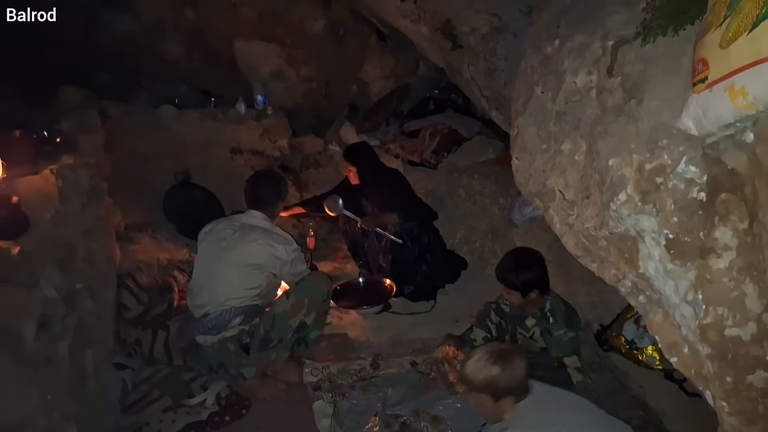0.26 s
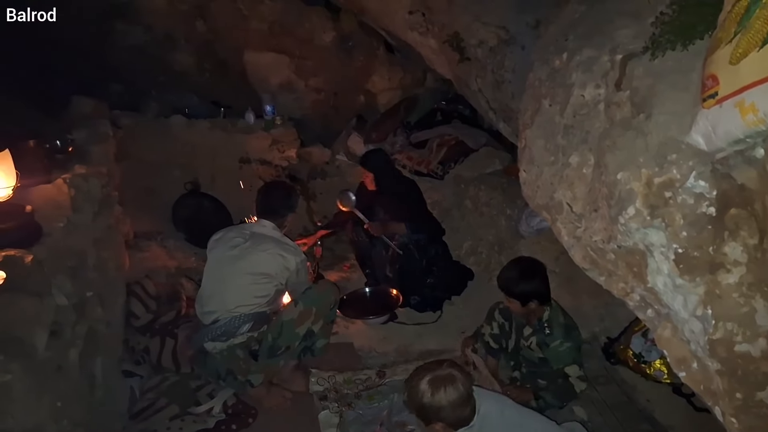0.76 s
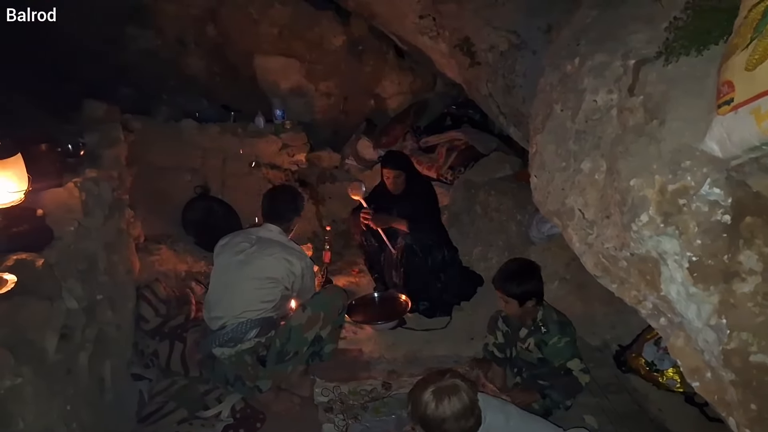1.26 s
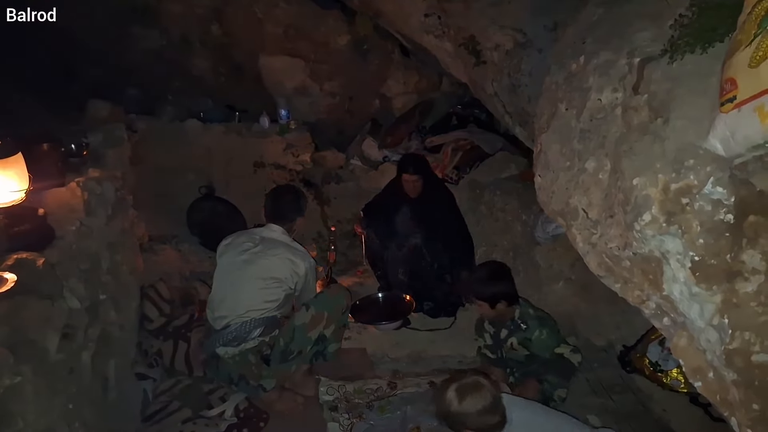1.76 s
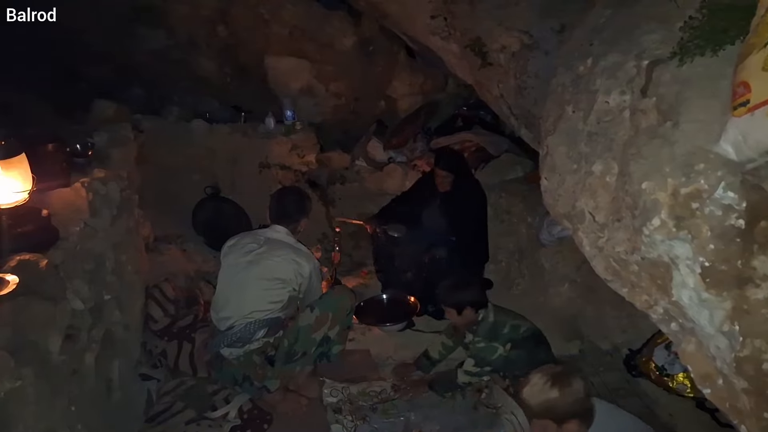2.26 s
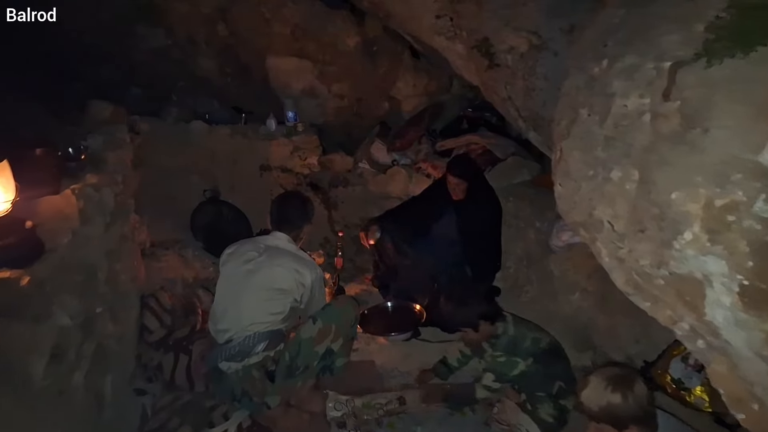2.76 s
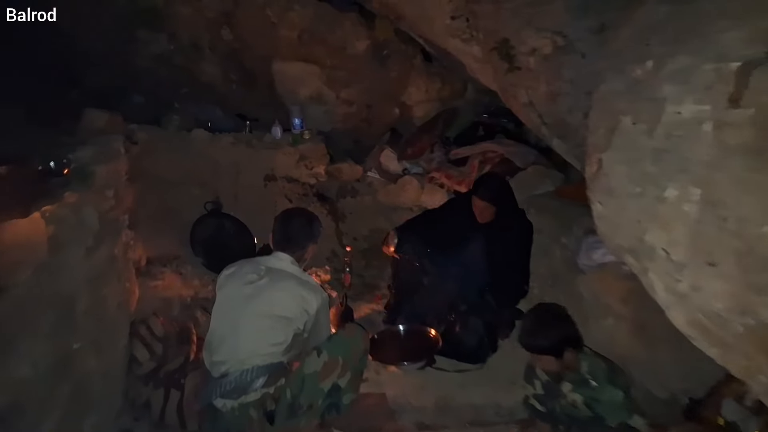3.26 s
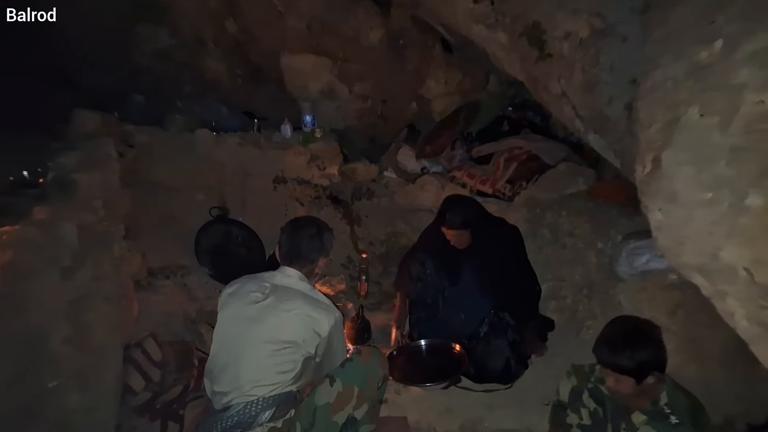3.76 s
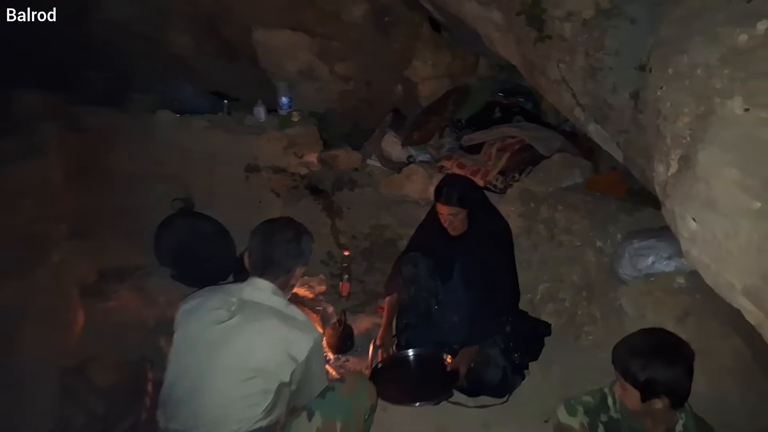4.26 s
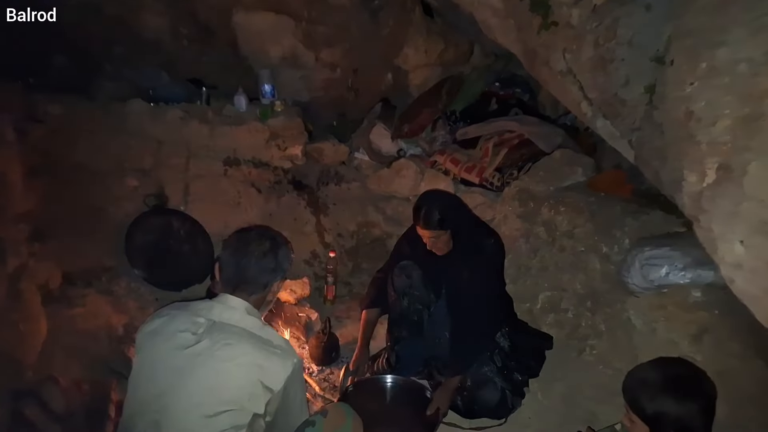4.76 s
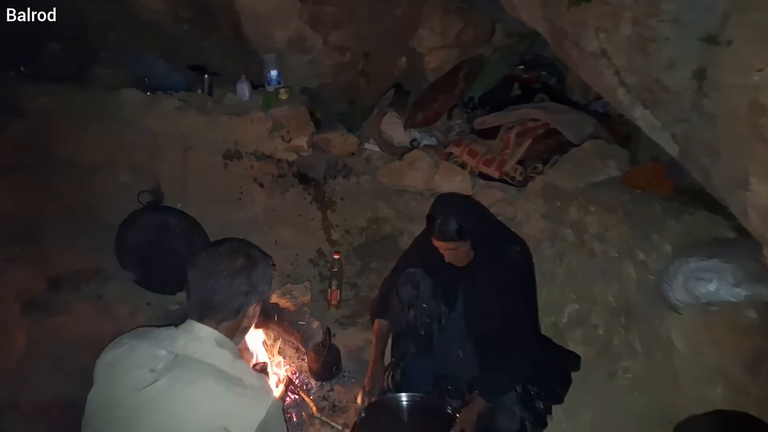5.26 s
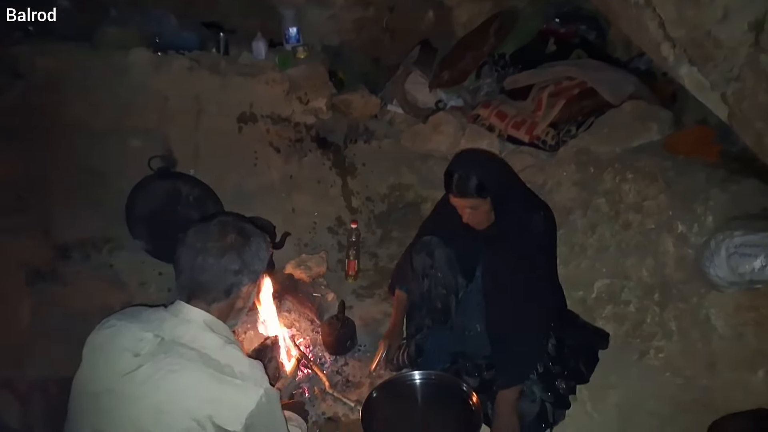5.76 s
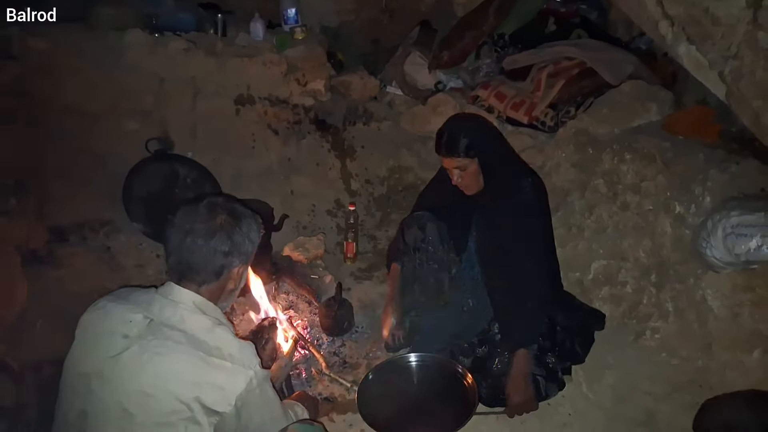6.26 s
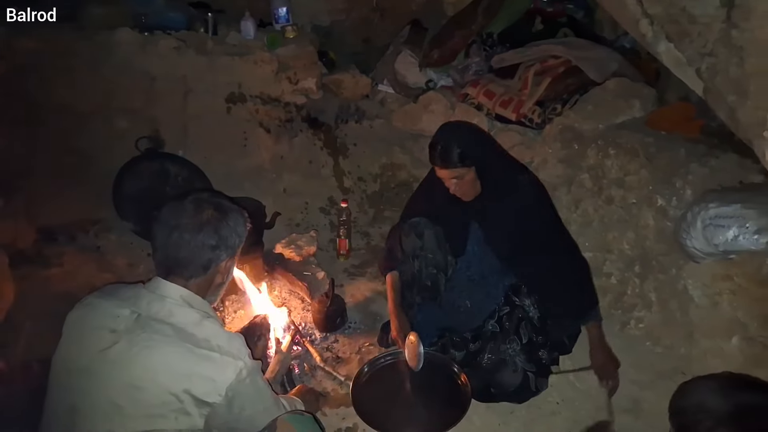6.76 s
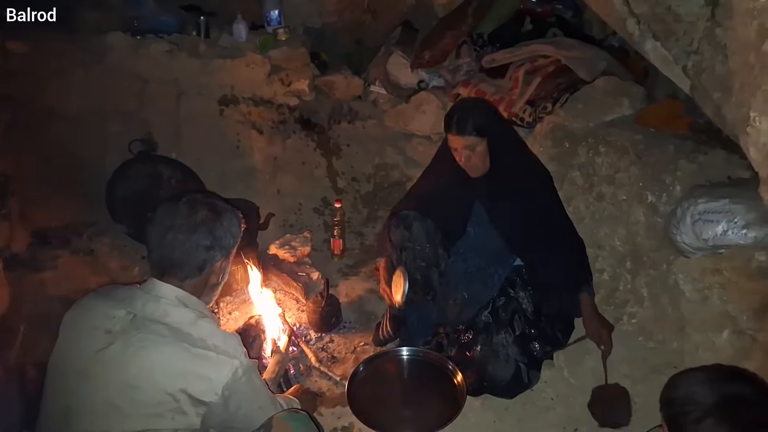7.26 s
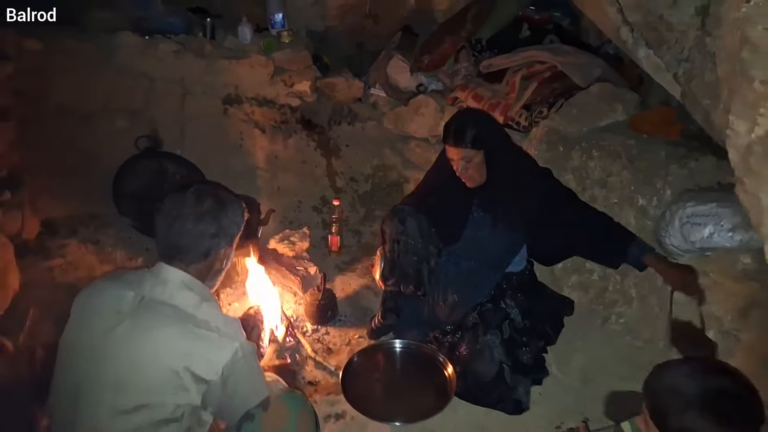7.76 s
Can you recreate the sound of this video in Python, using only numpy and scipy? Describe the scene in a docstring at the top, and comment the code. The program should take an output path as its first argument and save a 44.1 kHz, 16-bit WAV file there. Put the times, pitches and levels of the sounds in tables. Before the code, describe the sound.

Close, quick hollow knocks on a vessel fill the first half second over shuffling grit and cloth. Then it quietens: a cricket chirps in short groups over a faint distant chorus, embers tick, and a small liquid-like note rises. Later a ladle taps, a pan scrapes and bangs on stone twice. Night in a rock shelter with short wall reflections; stereo microphone close by, the left side duller.

```python
"""Knocks on a hollow vessel are heard first, at night in a rock hollow, as broad modes that die fast, over low rumble.
A cricket follows, singing in short groups of falling whistles over a far chorus of narrow-band noise.
A tapped ladle and a struck pan ring in decaying sines; the pan, dragged on stone, rasps through its wall modes.
Cloth, grit and feet shuffle in swells of coloured noise, embers tick, a low note rises and the rock walls answer.
The left microphone port faces away: it hears the treble duller and a little later."""
import sys
import numpy as np
from scipy import signal
from scipy.fft import rfft, irfft, next_fast_len
from scipy.io import wavfile
from scipy.ndimage import map_coordinates

SR = 44100
rng = np.random.default_rng(int(sys.argv[2]) if len(sys.argv) > 2 else 0)


def log_audio(samples):
    """Write samples as a 16-bit WAV file to the path given in sys.argv[1]."""
    # one column per channel
    frames = np.atleast_2d(samples).T
    # limit to full scale, then quantise
    limited = np.clip(frames, -1, 1)
    pcm = np.round(limited * 32767).astype(np.int16)
    wavfile.write(sys.argv[1], SR, pcm)


N = 352800  # samples


def amp(db):
    """Decibel law: a level in dB becomes an amplitude factor."""
    return np.exp(np.asarray(db) * (np.log(10) / 20))


def unit(x):
    """Normalization to an rms of 1."""
    return x / np.sqrt(np.mean(x ** 2) + 1e-20)


def along(points, hz):
    """Linear interpolation of (frequency, value) points on a logarithmic frequency axis."""
    point_hz, value = np.transpose(points)
    return np.interp(np.log(hz + 1), np.log(point_hz + 1), value)


def wobble(rate):
    """Random modulation: a smooth curve through normal random knots, rate knots a second."""
    knots = rng.standard_normal(int(N * rate / SR) + 4)
    # the curve is computed at every 32nd sample
    coarse = map_coordinates(knots, [np.arange(N // 32 + 2) * 32 * rate / SR])
    return np.interp(np.arange(N) / 32, np.arange(len(coarse)), coarse)


def filtered(x, response):
    """Linear filtering: the spectrum of x times a complex response of frequency."""
    m = next_fast_len(N + SR // 2)
    return irfft(rfft(x, m) * response(np.fft.rfftfreq(m, 1 / SR)), m)[..., :N]


def resonances(modes):
    """Modal superposition: causal response of (pitch_hz, width_hz, level_db) modes in alternating sign."""
    def response(f):
        total = 0
        for k, (center, width, db) in enumerate(modes):
            bandpass = 1j * f * width / (center * center - f * f + 1j * f * width)
            total = total + (-1) ** k * amp(db) * bandpass
        return total
    return response


# correlation of the two ports in a diffuse field: pitch_hz [Hz], likeness [0 to 1]
DIFFUSE_LIKENESS = [(60, 0.98), (250, 0.27), (600, 0.39), (1500, 0.15), (4000, 0.18), (12000, 0.4)]


def rush(spectrum, lumps_db, rate, alike=DIFFUSE_LIKENESS):
    """Partly coherent noise: coloured stereo noise of rms 1 with random lumps in level."""
    hz = np.fft.rfftfreq(N, 1 / SR)
    # the share of mid and side sets the correlation of the ports
    turn = np.arccos(np.clip(along(alike, hz), 0, 1)) / 2
    noise = rng.standard_normal((2, len(hz), 2)).view(complex)[..., 0]
    mid, side = irfft(noise * amp(along(spectrum, hz)) * [np.cos(turn), np.sin(turn)], N)
    return unit(np.array([mid + side, mid - side]) * amp(lumps_db * wobble(rate)))


def swells(rows, column, rest_db):
    """Power addition: the level of one layer under all its swells, over its rest level."""
    loss_db, shape = 10, 1.4  # loss one rise or fall away from the peak; 1 = pointed, 2 = round
    t = np.arange(0, N, 32) / SR
    power = amp(2 * rest_db)
    for s, rise, fall, *db in rows:
        away = np.where(t < s, (s - t) / rise, (t - s) / fall)
        power = power + amp(2 * (db[column] - loss_db * away ** shape))
    return np.interp(np.arange(N) / SR, t, np.sqrt(power))


# colour of steady air and far valley: pitch_hz [Hz], relative level_db [dB per Hz]
NIGHT_COLOUR = [(24, -31.5), (40, 0), (85, 0.5), (188, -7), (440, -22), (593, -14), (907, -20.5),
                (1740, -23), (3670, -26), (4600, -15.5), (5610, -28), (9720, -23.5), (15600, -33.5)]


def night():
    """Broadband ambience: steady coloured noise of air and far valley."""
    return amp(-72.5) * rush(NIGHT_COLOUR, lumps_db=0.84, rate=9.3)


# level of the far crickets: start_s [s], level_db [dB]
CHORUS_LEVEL = [(0, -71), (.3, -66), (.64, -71.5), (1.6, -74), (2.07, -69.5), (2.4, -73.5), (2.76, -70),
                (3.1, -72.5), (3.85, -71), (5.06, -74), (5.3, -68.5), (5.68, -89), (5.97, -77),
                (6.15, -71.5), (6.97, -76.5), (7.13, -71.5), (7.6, -78), (8, -72)]
# colour of the far crickets: pitch_hz [Hz], relative level_db [dB per Hz]
CHORUS_COLOUR = [(3600, -36), (4200, -7), (4700, -5), (5100, -7), (5700, -35)]


def far_chorus():
    """Incoherent summation: many far crickets merge into narrow-band noise."""
    start_s, level_db = np.transpose(CHORUS_LEVEL)
    level = amp(np.interp(np.arange(N) / SR, start_s, level_db))
    return level * rush(CHORUS_COLOUR, lumps_db=3.0, rate=35)


# swells of low rumble: peak_s [s], rise_s [s], fall_s [s], level_db [dB]
RUMBLES = [(.03, 0.11, 0.105, -50), (.27, 0.09, .1, -51), (.5, 0.064, 0.058, -49.5),
           (.74, 0.077, 0.0278, -57), (.88, 0.065, 0.073, -54), (.99, 0.041, 0.061, -47),
           (1.47, 0.0483, 0.0654, -58), (1.64, 0.0707, 0.055, -55), (1.95, .1, .04, -62),
           (2.18, 0.0412, 0.098, -59.5), (2.78, 0.1035, 0.037, -59.5), (2.92, 0.061, 0.073, -55.5),
           (3.33, 0.104, 0.107, -59), (3.58, 0.0489, .08, -63), (4.03, .04, .04, -58),
           (4.13, .03, 0.0794, -54), (4.33, 0.074, 0.105, -57.5), (4.66, 0.116, 0.086, -54.5),
           (5.22, 0.046, 0.103, -54.5), (5.5, 0.099, 0.095, -61), (5.95, 0.086, 0.0401, -65),
           (6.47, .08, 0.052, -57.5), (6.66, .04, 0.061, -57), (6.8, 0.055, 0.085, -59.5),
           (6.96, 0.0508, 0.0508, -56.5), (7.32, 0.0498, 0.073, -52.5), (7.73, 0.0706, 0.129, -59)]
# colour of the rumble: pitch_hz [Hz], relative level_db [dB per Hz]
RUMBLE_COLOUR = [(15, -50), (25, -18.5), (48, -5), (70, 2), (95, -4), (155, -26), (200, -25.5), (260, -56),
                 (440, -120)]


def rumble():
    """Amplitude modulation: swells of low rumble, partly ground or handling under the movements."""
    return swells(RUMBLES, column=0, rest_db=-74) * rush(RUMBLE_COLOUR, lumps_db=2.5, rate=14)


# loud ember ticks: start_s [s], level_db [dB, before a lift of 12 dB]
LOUD_TICKS = [(1.735, -54), (2.0457, -47), (3.2394, -57.5), (4.9157, -43.5), (5.2594, -51.5),
              (6.0107, -53.5), (6.8957, -59.5), (6.9182, -54.5), (7.0294, -53.5), (7.7084, -55),
              (7.8276, -61), (7.9718, -56.5)]


def embers():
    """Impulsive excitation: sharp ticks of the fire, a few loud ones over many faint ones."""
    blows = np.zeros(N)
    faint = rng.random((120, 2))
    # exponentially spread levels
    blows[(faint[:, 0] * N).astype(int)] = amp(-62.5 - 3.4 * np.log(1 - faint[:, 1]))
    for s, db in LOUD_TICKS:
        blows[round(s * SR)] = amp(db + 12)
    t = np.arange(SR // 40) / SR
    snap = np.diff(rng.standard_normal(len(t) + 1)) * amp(-60 * t / .012)  # t60 12 ms
    return signal.fftconvolve(blows, snap / np.linalg.norm(snap))[:N]


# movements of people on the ground: peak_s [s], rise_s [s], fall_s [s],
# feet_db [dB], grit_db [dB], cloth_db [dB], sizzle_db [dB]
MOVEMENTS = [(.13, 0.15, 0.178, -53, -52.5, -57, -67), (.28, .08, .1, -51, -58, -61, -60),
             (.406, .06, .1, -56, -52.5, -56, -59), (.66, .05, .08, -63, -57, -61, -66),
             (.87, .07, 0.062, -69.5, -65, -62, -75), (.97, .06, 0.1417, -64.5, -62.5, -67, -74),
             (1.31, .05, .06, -78, -80, -81.5, -90), (1.47, 0.031, 0.112, -72.5, -78, -72.5, -84),
             (1.62, .06, 0.076, -69.5, -86.5, -94, -92), (1.79, .08, 0.1685, -71, -69.5, -61.5, -65),
             (2.07, .03, 0.0379, -85.5, -63, -58.5, -66), (2.29, .1, 0.1023, -61, -68, -69.5, -77),
             (2.47, .1, .05, -82, -72.5, -69, -79), (2.68, 0.041, 0.11, -59.5, -66.5, -63.5, -71),
             (2.83, 0.13, 0.191, -67.5, -64, -65, -75), (3.1, .1, 0.109, -72.5, -74, -73.5, -84.5),
             (3.3, 0.075, 0.0956, -64.5, -61.5, -65, -72), (3.52, 0.1175, 0.1234, -71, -68, -66.5, -73),
             (3.7, .08, 0.113, -75, -74, -73.5, -84), (3.88, 0.079, 0.0797, -70, -69.5, -68.5, -82),
             (4.04, 0.067, 0.0855, -73.5, -78.5, -75, -88), (4.29, 0.049, 0.087, -63.5, -68, -64.5, -77),
             (4.4, 0.094, 0.0893, -59, -61, -63, -72), (4.62, 0.13, .2, -60, -72, -73.5, -78),
             (5.03, 0.139, 0.098, -60, -68, -72, -78), (5.19, 0.11, .08, -65.5, -62, -65.5, -74),
             (5.41, .1, 0.1025, -52.5, -79.5, -76, -85), (5.52, .05, .04, -71.5, -75, -67.5, -72),
             (5.86, .12, .06, -70, -95, -96.5, -95), (6.02, 0.031, 0.092, -75.5, -78, -79, -92),
             (6.33, .1, .05, -63, -72.5, -77.5, -87), (6.47, .08, .1, -55, -57.5, -65, -77.5),
             (6.59, .05, 0.0836, -60.5, -56.5, -68.5, -82), (6.73, 0.069, 0.0536, -62.5, -69, -67, -71),
             (6.9, 0.1087, 0.0636, -64, -79.5, -73, -82.5), (7.29, .05, 0.1017, -56.5, -75.5, -70.5, -84),
             (7.52, 0.14, .1, -67, -72.5, -70.5, -81), (7.73, .04, 0.047, -64.5, -77.5, -74, -71),
             (7.86, .08, .06, -63, -74.5, -77.5, -82), (7.98, .04, .04, -64, -80, -66, -80)]
# small shifting between movements: level_db [dB] of feet, grit, cloth, sizzle
REST_LEVELS = [-81, -85.5, -79, -90]
# colours of the four layers: pitch_hz [Hz], relative level_db [dB per Hz]
FEET_COLOUR = [(70, -30.5), (130, -4), (250, 1), (450, -8.5), (800, -8.5), (1400, -36.5)]
GRIT_COLOUR = [(500, -38.5), (1000, -6.5), (2000, -5), (4000, -7.5), (7000, -35.5)]
CLOTH_COLOUR = [(2500, -21), (5000, -0.5), (7000, 6), (9000, 1), (11500, 3.5), (13000, -6.5), (16000, -25)]
SIZZLE_COLOUR = [(10500, -35.5), (12500, -1), (14500, -2), (16000, -8)]


def movements():
    """Friction noise: each movement is a swell in four bands, from low feet to the highest sizzle."""
    stir = wobble(14)  # one movement stirs feet, grit and cloth together
    feet, grit, cloth, sizzle = (swells(MOVEMENTS, k, rest_db) for k, rest_db in enumerate(REST_LEVELS))
    return (feet * amp(0.87 * stir) * rush(FEET_COLOUR, lumps_db=2.5, rate=25)
            + grit * amp(1.0 * stir) * rush(GRIT_COLOUR, lumps_db=0.81, rate=87)
            + cloth * amp(.6 * stir) * rush(CLOTH_COLOUR, lumps_db=1.43, rate=130)
            + sizzle * rush(SIZZLE_COLOUR, lumps_db=2.05, rate=30))


# low rising note: level_db [dB], rise_s [s], length_s [s], pitch_hz at the peak [Hz], climb_hz [Hz]
RISING_NOTE = (-56, 0.003, 0.193, 261.5, 69.5)


def glug():
    """Frequency glide: a soft sine, like liquid in a pot, swells fast, climbs ever slower, fades and stops."""
    db, rise, length, hz, climb = RISING_NOTE
    t = np.arange(N) / SR - 2.738  # seconds from the peak
    swell_db = -12 * np.maximum(-t / rise, 0)
    fade_db = -11 * np.clip(t / length, 0, 1) ** .5
    stop_db = -900 * np.maximum(t - 0.686 * length, 0)
    pitch = hz + climb * np.tanh(np.clip(t, -.03, length) / 0.055)
    return np.sqrt(2) * amp(db + swell_db + fade_db + stop_db) * np.sin(2 * np.pi * np.cumsum(pitch) / SR)


# phrases of the near cricket: first_stroke_s [s], last_stroke_s [s], level_db [dB]
PHRASES = [(1.098, 1.342, -62.5), (1.515, 1.594, -69), (1.876, 2.121, -57.5), (2.68, 2.843, -53.5),
           (3.592, 3.755, -54.5), (5.018, 5.268, -57.5), (5.973, 6.218, -63), (6.968, 7.214, -60.5),
           (7.782, 7.944, -61.5)]


def cricket():
    """Stridulation: each wing stroke whistles, holds and drops as the file slows; a near rock repeats it."""
    stroke_gap_s, scatter_db, first_stroke_db = .082, 1.99, -1  # a phrase starts softly
    out = np.zeros(N + SR)
    length = round(.025 * SR)
    u = np.arange(length) / length  # progress of one stroke, 0 to 1
    swell = np.sin(np.pi * u ** 1.5) ** .8
    for first, last, db in PHRASES:
        for s in np.linspace(first, last, round((last - first) / stroke_gap_s) + 1):
            pitch, bend, size = rng.standard_normal(3)
            hz = (5110 - 800 * u ** (2.3 + .2 * bend)) * (1 + .006 * pitch)
            level = amp(db + first_stroke_db * (s == first) + scatter_db * size)
            out[round(s * SR):][:length] += level * swell * np.sin(2 * np.pi * np.cumsum(hz) / SR)
    repeat = np.pad(out, (round(0.033 * SR), 0))[:N]
    return out[:N] + amp(-10) * repeat


def bursts(rows, column, slower, rise):
    """Exponential decay: each contact rises fast and dies with its own t60 times slower."""
    env, t = np.zeros(N + SR), np.arange(SR // 2) / SR
    for row in rows:
        decay = amp(row[column] - 60 * t / (slower * row[5]))
        env[round(row[0] * SR):][:len(t)] += decay * (1 - np.exp(-t / rise))
    return env[:N]


# correlation of the two ports for sounds close by: pitch_hz [Hz], likeness [0 to 1]
NEAR_LIKENESS = [(60, 1), (250, 0.969), (600, .88), (1500, 0.32), (4000, 0.18), (12000, .35)]
# colour of the clank: pitch_hz [Hz], relative level_db [dB per Hz]
CLANK_COLOUR = [(300, -30), (600, -3), (1200, 2.5), (2200, -2.5), (3500, -12), (6000, -35.5)]


def contacts(rows, thud_colour, crack_colour):
    """High modal density: a ground thud, a clank of modes too dense to tell apart and a treble crack."""
    def layer(colour, lumps_db, rate, **shape):
        return bursts(rows, **shape) * rush(colour, lumps_db, rate, NEAR_LIKENESS)

    thud = layer(thud_colour, 2.0, 55, column=2, slower=0.73, rise=0.0024)
    clank = layer(CLANK_COLOUR, 2.0, 200, column=3, slower=1.2, rise=0.00054)
    crack = layer(crack_colour, 3.5, 300, column=4, slower=.9, rise=0.0003)
    return thud + clank + crack


def ringing(rows, modes):
    """Modal synthesis: each blow on thin metal excites the same modes anew; they waver as it swings in the hand."""
    out, t = np.zeros(N + SR), np.arange(SR) / SR
    hz, db, t60 = np.transpose(modes)[..., None]
    swing_db = 5 * np.sin(2 * np.pi * (rng.uniform(5, 25, hz.shape) * t + rng.random(hz.shape)))
    onset = 1 - np.exp(-t / 0.00083)
    rings = amp(db + swing_db - 60 * t / t60) * np.sin(2 * np.pi * hz * t) * onset
    size = (len(rows), len(modes))
    strength = amp(1.74 * rng.standard_normal(size)) * rng.choice([-1, 1], size)
    hardest = max(row[4] for row in rows)
    for row, gain in zip(rows, strength):
        # a blow with little crack excites the high modes less
        soft_db = .4 * (row[4] - hardest) * np.log2(np.maximum(hz[:, 0] / 900, 1))
        out[round(row[0] * SR):][:SR] += amp(row[1]) * (gain * amp(soft_db)) @ rings
    return out[:N]


# single modes that stand out: start_s [s], pitch_hz [Hz], level_db [dB, before the swell], t60_s [s], swell_s [s]
LONE_MODES = [(.27, 2200, -57, 0.12, .01), (.31, 2142, -47.5, 0.565, .01), (.4, 2117, -44, 0.314, 0.018),
              (.47, 120, -38, 0.272, .01), (.592, 106.1, -18.5, 0.228, 0.00146),
              (0.623, 1281, -26, 0.104, 0.004), (4.721, 1318, -62, 1.2, 0.0273),
              (5.528, 3530, -70, 0.17, .004), (5.553, 1722, -64.5, 0.578, 0.018),
              (5.2, 1072, -60, 1.1, .03), (5.2, 862, -58, 1., .03), (4.52, 716.7, -47.5, 0.56, 0.018),
              (4.52, 552.5, -55.5, 3.68, 0.024), (5.2, 368.5, -35, .25, 0.0045),
              (5.29, 188.8, -32.5, 0.18, 0.0038), (5.3, 610.5, -54.5, 0.974, 0.037),
              (6.5, 606, -49, 1.2, 0.0224)]


def lone_modes():
    """Free vibration: single sine modes swell in and fade exponentially."""
    out, t = np.zeros(N + SR), np.arange(SR) / SR
    for s, hz, db, t60, swell in LONE_MODES:
        envelope = amp(db - 60 * t / t60) * (1 - np.exp(-t / swell))
        out[round(s * SR):][:SR] += envelope * np.sin(2 * np.pi * hz * t)
    return out[:N]


# thud and crack of vessel and ladle: pitch_hz [Hz], relative level_db [dB per Hz]
THUD_COLOUR = [(45, -50), (80, -4), (130, 5.5), (300, -3), (500, -10), (1000, -43.5)]
CRACK_COLOUR = [(1500, -23.5), (3000, -1), (4500, -3), (7000, -4.5), (10000, -10), (13000, -14),
                (16000, -29.5)]
# taps on the ladle: start_s [s], ring_db [dB], thud_db [dB], clank_db [dB], crack_db [dB],
# t60_s [s, scaled in each contact layer]
LADLE_TAPS = [(4.507, -45, -66.5, -47.5, -36.5, 0.0983), (4.53, -45, -62, -51.5, -58.5, 0.484),
              (4.749, -52.5, -66.5, -71, -64, 0.186), (4.906, -52.5, -71, -62.5, -70, 0.042),
              (4.965, -46.5, -51, -52.5, -65.5, 0.179), (5.1, -61.5, -66, -59, -82, 0.073),
              (5.449, -60, -42, -62, -59, 0.093), (5.514, -73, -66, -67, -56, 0.284)]
# modes of the ladle: pitch_hz [Hz], relative level_db [dB], t60_s [s]
LADLE_MODES = [(430.6, -11, 0.271), (549.3, -11.5, 0.476), (507.4, -11, 0.512), (615.5, -5.5, 0.357),
               (676.7, -7, 0.098), (716.7, -10, 0.308), (750, -7, 0.135), (1032.5, -15.5, 0.325),
               (1325, -18, 0.33), (1610, -10.5, 0.56), (1417, -14.5, .5), (1761, -8.5, 0.45),
               (1791, -7.5, 0.38), (2042, -13, 0.9), (2120, -14, 0.22), (2202, -4.5, 0.146),
               (2330, -5, 1.1), (2430, -21, .2), (2910, -13.5, 0.32), (3865, -10, 0.297), (4525, -9, 0.235),
               (5600, -16, 0.22), (5600, -23, .15), (6430, 1.5, 0.109)]


def ladle():
    """Impact excitation: taps give contact noise and ring the modes of the ladle."""
    return contacts(LADLE_TAPS, THUD_COLOUR, CRACK_COLOUR) + ringing(LADLE_TAPS, LADLE_MODES)


# drags of the pan on stone: start_s [s], length_s [s], level_db [dB],
# slide_s [s, the dying slide], slide_db [dB, at its start]
DRAGS = [(4.97, .14, -62, .06, -67), (5.187, .12, -39.5, .25, -56.5), (6.378, .04, -56, .02, -60),
         (6.446, .1, -40.5, 0.15, -55)]
# colour of the base on the stone: pitch_hz [Hz], relative level_db [dB per Hz]
BASE_COLOUR = [(90, -30), (180, -3.5), (370, -1.5), (600, -6), (900, -15.5), (1600, -38)]
# modes of the pan wall under the scrape: pitch_hz [Hz], width_hz [Hz], relative level_db [dB]
WALL_MODES = [(1117, 18, -4), (1448, 70, -0.5), (1582, 43, -4), (1800, 58, -0.5), (2044, 70, -3),
              (2304, 60, 0.5), (2777, 28, -2), (2919.8, 100, -6), (3527, 570, -7)]


def drag():
    """Stick-slip friction: the base catches and slips on stone; the grit sings in the modes of the wall."""
    grip_s, let_go_s, slide_loss_db = .005, .02, 16.5  # onset, release, fading over the slide
    t, env = np.arange(N) / SR, 0
    for s, length, db, slide, slide_db in DRAGS:
        knots_s = np.cumsum([s - grip_s, grip_s, length, let_go_s, slide, let_go_s])
        env = env + amp(np.interp(t, knots_s, [-120, db, db, slide_db, slide_db - slide_loss_db, -120]))
    wall = resonances(WALL_MODES)
    grit = amp(2.5 * wobble(150)) * rng.standard_normal(N)
    # the wall modes, with the treble rolled off above 4 kHz
    rasp = unit(filtered(grit, lambda hz: wall(hz) / (1 + 1j * hz / 4000) ** 2))
    base = rush(BASE_COLOUR, lumps_db=0.5, rate=40, alike=NEAR_LIKENESS)
    return env * amp(2 * wobble(70)) * (base + amp(-8) * rasp)


# blows on the pan: start_s [s], ring_db [dB], thud_db [dB], clank_db [dB], crack_db [dB],
# t60_s [s, scaled in each contact layer]
PAN_BLOWS = [(4.278, -64.5, -52.5, -86, -65, 0.125), (5.187, -52.5, -44, -49, -49, 0.13),
             (5.287, -44.5, -38.5, -53, -60, .1), (6.309, -63, -52.5, -73, -76, 0.083),
             (6.373, -59, -59.5, -47, -58, .06), (6.445, -36.5, -37.5, -48.5, -43.5, 0.15),
             (6.497, -47, -37.5, -50, -48.5, .08), (6.521, -44, -32, -48, -50, .12),
             (6.611, -58, -42.5, -53.5, -65.5, .1), (6.943, -72.5, -59.5, -73, -72.5, 0.144)]
# modes of the pan: pitch_hz [Hz], relative level_db [dB], t60_s [s]
PAN_MODES = [(160.4, -3, 0.74), (187.15, -3.5, 0.3), (260, 0.5, 0.166), (322, -11.5, 0.14),
             (371.8, -5, 0.113), (419.7, -9.5, 0.244), (504, -6.5, 0.198), (563.8, -11, 0.315),
             (607.2, -10.5, 0.565), (710.6, -4.5, 0.286), (869, -25.5, 0.62), (1719, -20, 0.35),
             (1974, -15, 0.319), (2386, -16.5, 0.43), (2600, -20.5, 0.24)]
# thud and crack of the pan: pitch_hz [Hz], relative level_db [dB per Hz]
PAN_THUD_COLOUR = [(60, -32.5), (130, -1), (200, 2.5), (350, -3), (550, -12.5), (1000, -45)]
PAN_CRACK_COLOUR = [(1500, -23), (3000, 1.5), (4500, -6.5), (7000, -3), (10000, -28), (13000, -27),
                    (16000, -35)]


def pan():
    """Impact and friction: the thin pan is struck, dragged and set down."""
    return contacts(PAN_BLOWS, PAN_THUD_COLOUR, PAN_CRACK_COLOUR) + drag() + ringing(PAN_BLOWS, PAN_MODES)


# knocks on the vessel: start_s [s], body_db [dB, before the body gain], thud_db [dB], clank_db [dB],
# crack_db [dB], t60_s [s, scaled in each layer]
VESSEL_KNOCKS = [(.034, -44.5, -51.5, -47.5, -56, 0.086), (.068, -50.5, -46.5, -42.5, -41.5, 0.076),
                 (.085, -22.5, -44, -50, -55, 0.077), (.138, -42.5, -29, -52.5, -51, 0.117),
                 (.163, -24, -43, -38.5, -53, 0.0843), (.247, -33, -34, -55, -59.5, 0.093),
                 (.309, -31, -19.5, -31, -33, 0.118), (.33, -39.5, -40, -40.5, -43, 0.15),
                 (.356, -27.5, -30, -44, -47.5, 0.0816), (.386, -16.5, -16.5, -32, -36, 0.1028),
                 (.439, -44, -37, -53, -55, 0.059), (.475, -63.5, -43.5, -60, -57.5, 0.14),
                 (.589, -24.5, -30, -26, -35, 0.0745), (.597, -18, -19.5, -24, -39, 0.1043),
                 (.627, -39.5, -32, -44.5, -50.5, 0.192), (.869, -73, -51.5, -67.5, -63.5, 0.102),
                 (.975, -72, -45.5, -72, -66, 0.101)]
# modes of the vessel: pitch_hz [Hz], width_hz [Hz], relative level_db [dB]
VESSEL_MODES = [(120, 28, -2), (169.5, 40, -3), (277.5, 52, -2.5), (425.7, 74, -7), (638.5, 32, -3),
                (761.3, 34, -2.5), (903, 64, -6), (1096.4, 70, -1.5), (1177.6, 62, 1), (1284, 43, -6.5),
                (1701, 91, -15)]


def vessel():
    """Damped resonance: a knock shakes the hollow body for a moment; its modes are broad and die fast."""
    shaking = bursts(VESSEL_KNOCKS, column=1, slower=.6, rise=0.0006) * rng.standard_normal(N)
    body = amp(19.5) * filtered(shaking, resonances(VESSEL_MODES))
    return contacts(VESSEL_KNOCKS, THUD_COLOUR, CRACK_COLOUR) + body


# reverberation of the rock walls: pitch_hz [Hz], t60_s [s]
ROCK_DECAY = [(100, 0.26), (1000, 0.13), (5000, 0.092), (12000, 0.36)]


def rock(x):
    """Reverberation: the walls answer and each frequency dies at its own speed."""
    hz, t, z = signal.stft(rng.standard_normal((2, SR // 2)), SR, nperseg=256)
    decay = amp(-60 * t / along(ROCK_DECAY, hz)[:, None])
    tail = signal.istft(z * decay, SR, nperseg=256)[1]
    late = np.pad(x, (350, 0))[None]  # delay in samples before the walls answer
    return signal.fftconvolve(late, tail / np.linalg.norm(tail[0]), axes=1)[:, :N]


def scene():
    """Superposition: all sources add, and the near ones also excite the rock."""
    near = vessel() + ladle() + lone_modes() + pan()
    song = cricket()
    echo = rock(amp(-8.5) * near.mean(0) + amp(1) * song)  # amp(1) is +1 dB
    background = night() + far_chorus() + rumble() + embers() + movements()
    return background + glug() + song + near + echo


# level difference of the ports: pitch_hz [Hz], left_minus_right_db [dB]
PORT_BALANCE = [(60, 0), (150, 1.0), (380, 2.5), (950, 2), (2380, -2.0), (5980, -7), (15000, -10.5)]
# delay of the left port behind the right: pitch_hz [Hz], lag [samples]
PORT_LAG = [(200, .3), (1100, 9.9), (2000, 4), (4500, 8.5)]


def record(dry):
    """Shading and delay: the left port is dull and late; the capsule drops the lowest bass; the band has a top."""
    top_hz = 15780
    side = np.array([[.5], [-.5]])  # left and right share each difference equally

    def response(hz):
        balance = amp(side * along(PORT_BALANCE, hz))
        delay = np.exp(-2j * np.pi * hz * side * along(PORT_LAG, hz) / SR)
        capsule = (1j * hz / (1j * hz + 30)) ** 2  # 30 Hz high-pass
        return balance * delay * capsule * (hz < top_hz)

    return filtered(dry, response)


dry = scene()
out = record(dry)
log_audio(out)
```